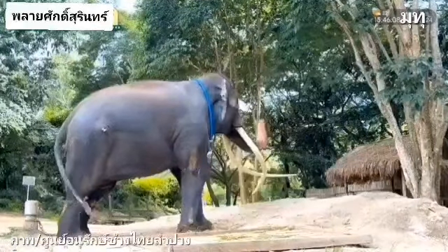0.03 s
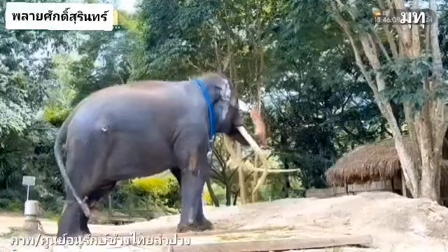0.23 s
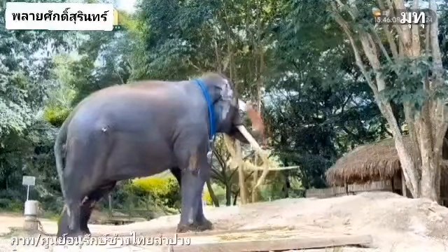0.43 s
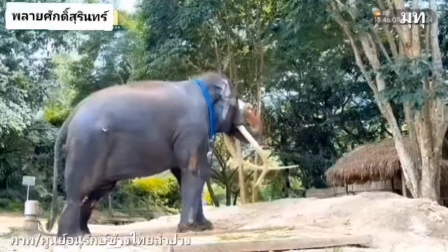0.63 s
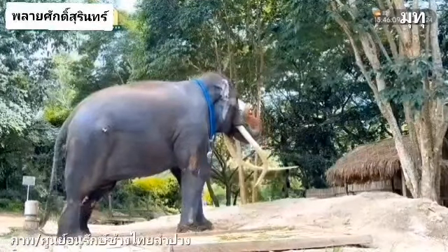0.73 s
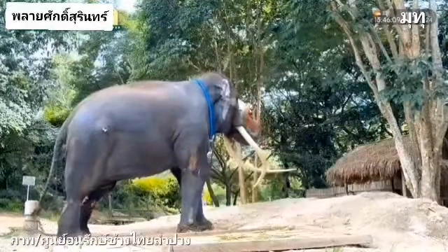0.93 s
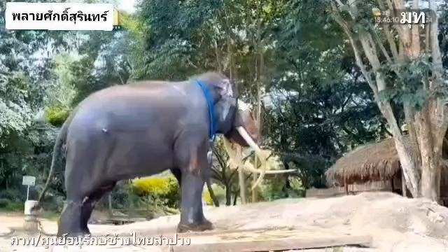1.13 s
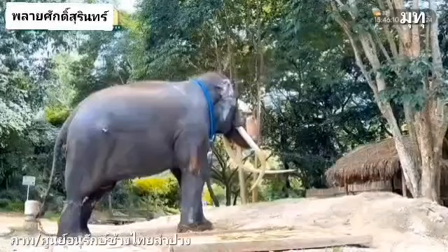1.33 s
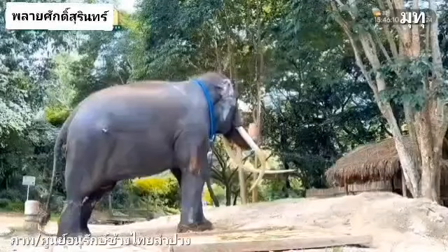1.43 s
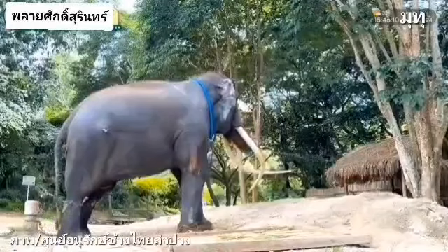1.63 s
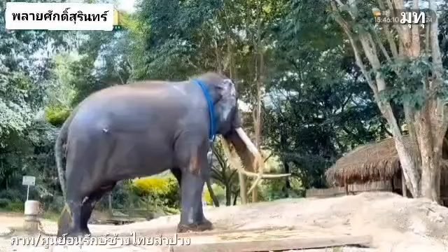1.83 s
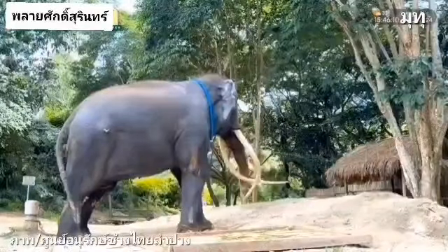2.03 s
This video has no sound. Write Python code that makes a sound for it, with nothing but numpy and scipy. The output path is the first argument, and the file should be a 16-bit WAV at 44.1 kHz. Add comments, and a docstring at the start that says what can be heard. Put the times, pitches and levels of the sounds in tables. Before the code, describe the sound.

One loud, raspy elephant trumpet, followed by soft echoes and a quiet outdoor hush.

```python
"""Elephant trumpet in a forest clearing

One blast through a buzzing trunk: a horn-like tone swoops up with a growl, turns brassy, sags and
ends in a rasp, with rushing air and a fine sizzle on top. The trees throw it back over a quiet
outdoor hush and a faint high chirr. The call overloads a mono microphone."""
import sys
import numpy as np
from scipy import signal
from scipy.fft import rfft, irfft
from scipy.io import wavfile

SR = 44100
rng = np.random.default_rng(int(sys.argv[2]) if len(sys.argv) > 2 else 0)


def int16_out(signal):
    """Quantize to a 16-bit WAV file."""
    q = np.round(np.clip(np.atleast_2d(signal).T, -1, 1) * 32767)
    wavfile.write(sys.argv[1], SR, q.astype(np.int16))


N = 92610
T = np.arange(N) / SR

# The call's stages: the growl clears, the tone holds clean, then it breaks into a rasp.
CLEAN_FROM_S, CLEAN_TO_S, BREAK_S = 0.35, 0.632, 0.022
STAGES_S = [CLEAN_FROM_S - BREAK_S, CLEAN_FROM_S, CLEAN_TO_S, CLEAN_TO_S + BREAK_S]


def from_db(db):
    """Decibels to gain."""
    return 10 ** (np.asarray(db) / 20)


def rms_one(x):
    """Scale to unit rms."""
    return x / np.sqrt(np.mean(x ** 2) + 1e-20)


def in_time(rows):
    """Turn breakpoints into curves, one for each column after the time."""
    time_s, *columns = np.transpose(rows)
    return [np.interp(T, time_s, column) for column in columns]


def at_hz(eq, hz):
    """Read an EQ curve in dB on a log-frequency axis."""
    freq_hz, gain_db = np.transpose(eq)
    return np.interp(np.log(np.maximum(hz, 1)), np.log(freq_hz), gain_db)


def coloured(x, eq):
    """Filter a signal through an EQ curve."""
    bins_hz = np.arange(N + 1) * SR / (2 * N)
    return irfft(rfft(x, 2 * N) * from_db(at_hz(eq, bins_hz)))[..., :N]


def drift(rate_hz):
    """Smooth random wobble at unit rms."""
    pole = np.exp(-2 * np.pi * rate_hz / SR)
    return rms_one(signal.lfilter([1], [1, -2 * pole, pole * pole], rng.standard_normal(2 * N))[N:])


def by_stage(onset, clean, rasp):
    """Glide a setting through the three stages of the call."""
    return np.interp(T, STAGES_S, [onset, clean, clean, rasp])


def hush():
    """A steady bed of distant leaves and surroundings."""
    # Colour of the bed: freq_hz, gain_db
    hush_eq = [(25,-13),(50,-4.5),(90,-2),(140,1.5),(230,-4.5),(420,-7),(1500,-10.5),(2150,-6),(2750,-10),(3150,-9.5),(3800,-14),(4400,-9.5),(5300,-15),(7000,-17),(8900,-13.5),(10000,-20.5),(14000,-28)]
    return from_db(-42) * rms_one(coloured(rng.standard_normal(N), hush_eq))


def chirr(centre_hz=3665, band_hz=433, peak_s=1.26, width_s=0.21):
    """A narrow band of high noise swells and fades among the trees, perhaps an insect."""
    radius = np.exp(-np.pi * band_hz / SR)
    resonator = [1, -2 * radius * np.cos(2 * np.pi * centre_hz / SR), radius * radius]
    band = signal.lfilter([1, 0, -1], resonator, rng.standard_normal(N))
    swell = np.exp(-((T - peak_s) / width_s) ** 2)
    return from_db(-47.5) * rms_one(band) * swell


def clearing(call):
    """Near and far trees scatter the call into a reverb tail and return three distinct echoes."""
    # Colour of the reverb: freq_hz, gain_db
    forest_eq = [(200,-1),(500,3.5),(1100,8.5),(1700,4.5),(2200,6.5),(3800,13),(6000,6),(14000,-8)]
    # Echoes off the trees: delay_s, bass_db, middle_db, treble_db
    echoes = [(.18,-38,-32.5,-28.5),(.29,-33.5,-43,-41.5),(.62,-45,-47,-58)]
    echo_bands_hz = (567, 1020, 1700)
    fade_in = np.clip(T / 0.012, 0, 1)
    response = np.zeros(N)
    for level_db, decay_s in ((-21, 0.36), (-33.5, 1.5)):  # near trees, far trees
        tail = rng.standard_normal(N) * 0.00035 ** (T / decay_s) * fade_in  # 69 dB down at decay_s
        response += from_db(level_db) * rms_one(tail) / np.sqrt(N)
    wet = coloured(signal.fftconvolve(call, response)[:N], forest_eq)
    for delay_s, *bands_db in echoes:
        delayed = np.interp(T - delay_s, T, call, left=0)
        wet += coloured(delayed, list(zip(echo_bands_hz, bands_db)))
    return wet


def rushing_air(phase):
    """Breath rushes through the trunk, pulsing lightly with each cycle of the buzz."""
    # Colour of the breath: freq_hz, gain_db
    air_eq = [(200,-38),(450,-35),(700,-6.5),(1000,5),(1600,4.5),(3000,1),(4500,-7),(7000,-24.5),(14000,-26)]
    pulsing = 1 + 0.1 * np.cos(phase)
    return rms_one(coloured(rng.standard_normal(N) * pulsing, air_eq))


def sizzle(brass_db):
    """Fine bright noise rides on the level of the brassy partials."""
    sizzle_eq = [(3000, -30), (6200, 4.5), (9500, -1.5), (14000, -11)]  # freq_hz, gain_db
    level_db = -29 + 1.05 * (brass_db + 20.5)
    return rms_one(coloured(rng.standard_normal(N), sizzle_eq)) * from_db(level_db)


def brass_colour(hz, peaks_db=(9, 10), width_hz=320):
    """Relative dB of an upper partial under two bright resonances that shift as the trunk swings."""
    # Overall colour of the brass: freq_hz, gain_db
    brass_eq = [(2000,25),(3000,7),(5000,-6),(7000,-6.5),(9000,-34),(14000,-30)]
    # Paths of the resonances: time_s, lower_hz, upper_hz
    resonances = [(.36,2990,5460),(.4,3540,6040),(0.459,4200,7443),(0.504,3325,5698),(0.542,3820,5700),(0.584,2782,6550),(0.624,3420,4520)]
    boost_db = sum(peak_db * np.exp(-((hz - centre_hz) / width_hz) ** 2)
                   for peak_db, centre_hz in zip(peaks_db, in_time(resonances)))
    return at_hz(brass_eq, hz) + boost_db


def trunk_buzz(pitch_hz, phase, brass_db):
    """Twenty harmonics: growling on the way up, clean and brassy on top, rasping as pressure drops."""
    # Envelopes of the four lowest harmonics: time_s, first_db, second_db, third_db, fourth_db
    body_levels = [(.15,-28,-62,-43,-55),(.178,-27,-42,-49,-74),(.2,-17,-15.5,-31,-26),(.222,-16.5,-35,-16.5,-57),(.245,-16.5,-19,-28.5,-26),(.26,-23.5,-20,-24.5,-28.5),(.276,-3.5,-18.5,-12.5,-42),(.305,4.5,-13,-36,-41),(.33,-5,-12.5,-23,-38.5),(.352,-12.5,-5.5,-13.5,-19.5),(.374,-18.5,-9,-14.5,-15.5),(.395,-18.5,0,-14,-26),(.432,-13,-3,-9.5,-17),(.46,-23.5,-5,-4.5,-15.5),(.477,-10.5,-9,-2.5,-5.5),(.51,-9.5,-9,-10,-35.5),(.555,-8,-11.5,-10.5,-16),(.586,-7,-2.5,-3.5,-6.5),(.626,-8.5,-9.5,-10,-13.5),(.648,-11,-11,-26,-23.5),(.7,-10,-11,-19.5,-29),(.722,-10.5,-22,-25,-46),(.735,-21.5,-21,-42,-24.5),(.78,-36,-49,-40,-41)]
    body = [from_db(db) for db in in_time(body_levels)]
    brass = np.array([from_db(brass_colour(k * pitch_hz)) for k in range(5, 21)])
    brass = brass / np.sqrt(np.sum(brass ** 2, axis=0)) * from_db(brass_db)
    growl_db = by_stage(onset=2, clean=0, rasp=0) * drift(rate_hz=107)
    roughness_rad = by_stage(onset=0.41, clean=0.04, rasp=0.42)
    tone = np.zeros(N)
    for k, gain in enumerate([*body, *brass], start=1):
        shimmer_db = 2.13 * drift(rate_hz=23.2)
        tremble = from_db(shimmer_db + growl_db * (k > 1))  # only the overtones growl
        stray_phase = (k - 1) * roughness_rad * drift(rate_hz=50.4)
        tone += gain * tremble * np.sin(k * phase + stray_phase)
    return np.sqrt(2) * tone


def period_doubling(phase, peak_s=0.499, width_s=0.017):
    """Half-pitch partials creep in for a moment at mid call."""
    # Partials at 1/2, 3/2 and 5/2 of the pitch: level_db
    halves_db = [-29, -32, -20]
    halves = sum(from_db(db) * np.sin((k + 0.5) * phase) for k, db in enumerate(halves_db))
    swell = np.exp(-((T - peak_s) / width_s) ** 2)
    return np.sqrt(2) * swell * halves


def trumpet(start_s=0.14, end_s=0.804, attack_s=0.0045, release_s=0.025, buzz_db=1):
    """The elephant blows through its trunk: buzz, breath and sizzle in one swooping blast."""
    # Swoop and sag of the trunk's note: time_s, pitch_hz
    melody = [(.145,537.3),(.178,426.3),(.2,420.6),(.222,393.1),(.25,434.8),(.274,469),(.318,525.6),(.335,576.5),(.36,604),(.388,593.8),(.442,568.8),(.48,565.4),(.52,565.9),(.564,546),(.605,546.8),(.635,544.1),(.66,515),(.702,486.2),(.735,421.6),(.78,369)]
    # Envelopes of the upper partials and the breath: time_s, brass_db, air_db
    blare = [(.145,-55,-40),(.185,-47.5,-46),(.2,-37.5,-28.5),(.23,-41.5,-31.5),(.255,-31,-32),(.3,-20,-28.5),(.33,-30,-26.5),(.36,-20.5,-17.5),(.41,-9,-21.5),(.47,-17.5,-26.5),(.53,-18,-34),(.58,-19.5,-34),(.625,-18,-36),(.648,-18,-19.5),(.7,-29.5,-20.5),(.735,-36.5,-26.5),(.78,-59,-36.5)]
    pitch_hz, = in_time(melody)
    brass_db, air_db = in_time(blare)
    jitter = by_stage(onset=0.01, clean=0.00026, rasp=0.011) * drift(rate_hz=136)
    phase = 2 * np.pi * np.cumsum(pitch_hz * (1 + jitter)) / SR
    phase += 0.014 * drift(rate_hz=720)  # uneven cycles blur the highest partials
    buzz = from_db(buzz_db) * trunk_buzz(pitch_hz, phase, brass_db)
    air = from_db(air_db) * rushing_air(phase)
    gate = np.clip((T - start_s) / attack_s, 0, 1) * np.clip((end_s - T) / release_s, 0, 1)
    return gate * (buzz + period_doubling(phase) + air + sizzle(brass_db))


def scene():
    """The call, its echoes and the outdoor bed, alike in both channels."""
    call = trumpet()
    return np.tile(call + clearing(call) + hush() + chirr(), (2, 1))


def record(dry):
    """The microphone overloads a little lopsidedly; the treble is dulled and the top is cut."""
    # High shelf after the overload: freq_hz, gain_db
    treble_eq = [(5000,0.5),(8500,-6),(14000,-5)]
    clip_level, bias, hardness, cutoff_hz = 0.86, 0.03, 4.5, 14200
    ceiling = clip_level - bias * np.sign(dry)
    clipped = dry / (1 + np.abs(dry / ceiling) ** hardness) ** (1 / hardness)
    dulled = coloured(clipped, treble_eq)
    lowpass = signal.ellip(10, 0.05, 60, cutoff_hz, fs=SR, output="sos")
    return signal.sosfiltfilt(lowpass, dulled)


dry = scene()
out = record(dry)
int16_out(out)
```